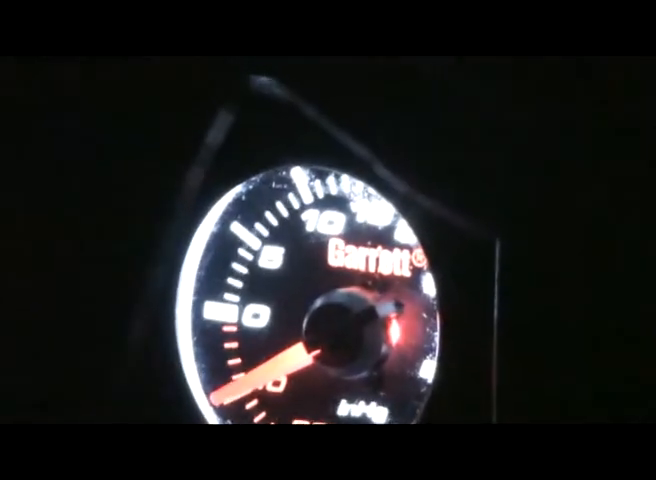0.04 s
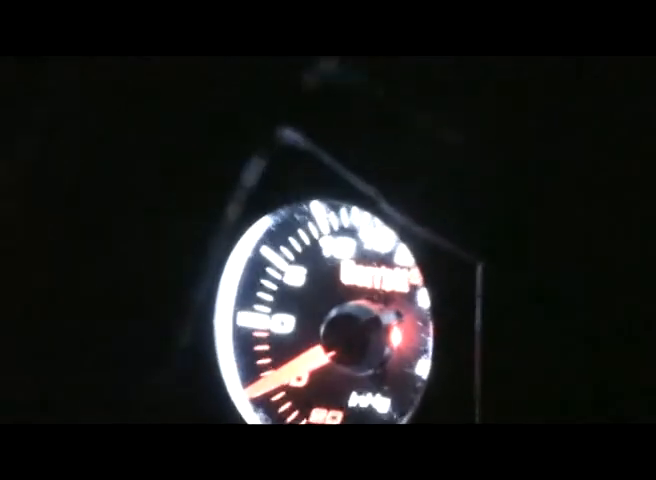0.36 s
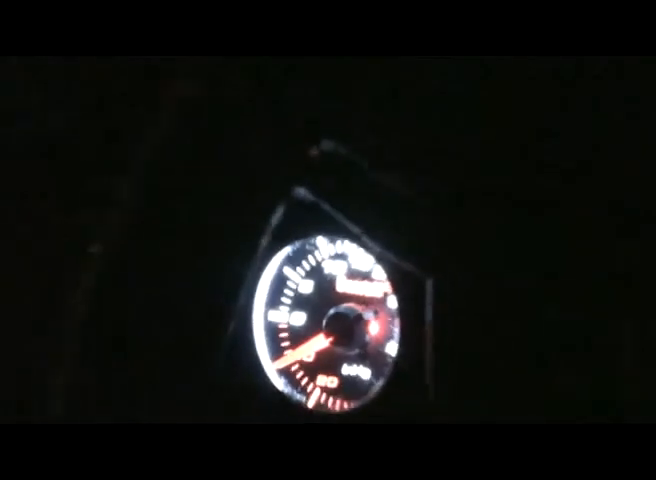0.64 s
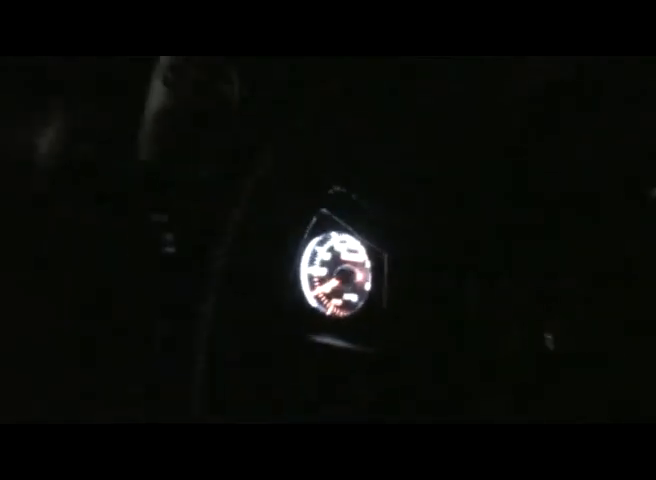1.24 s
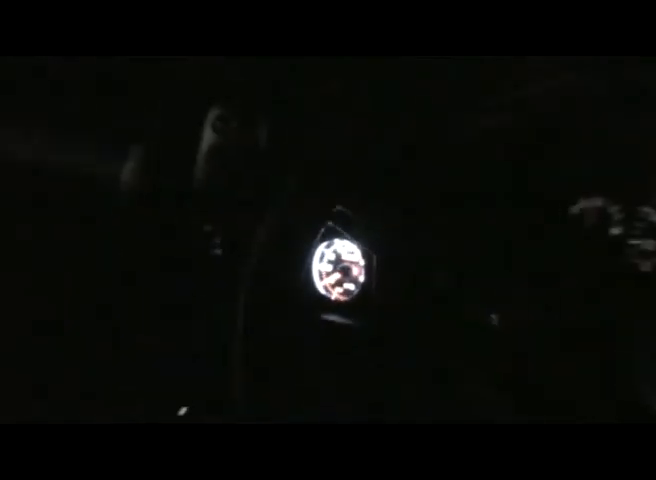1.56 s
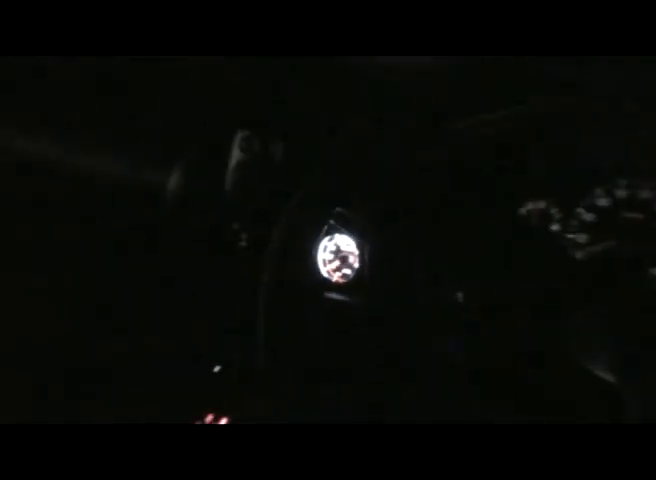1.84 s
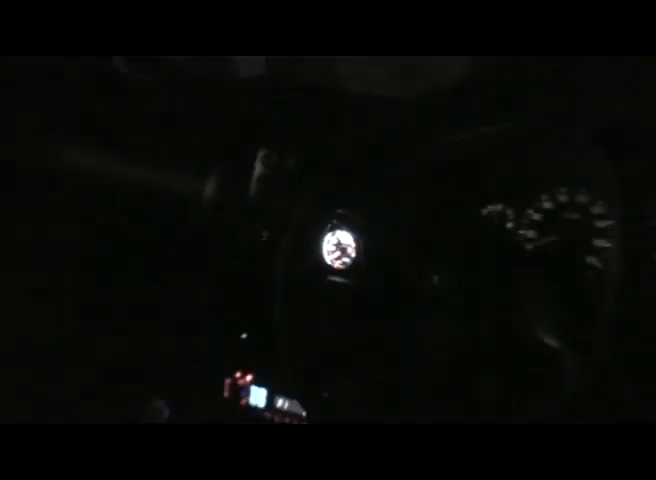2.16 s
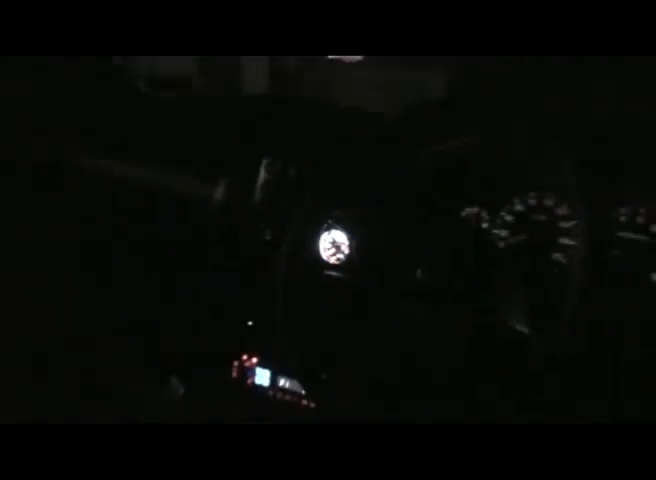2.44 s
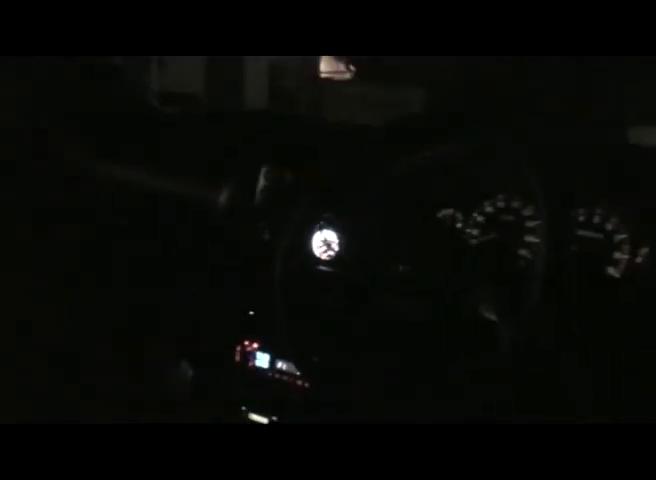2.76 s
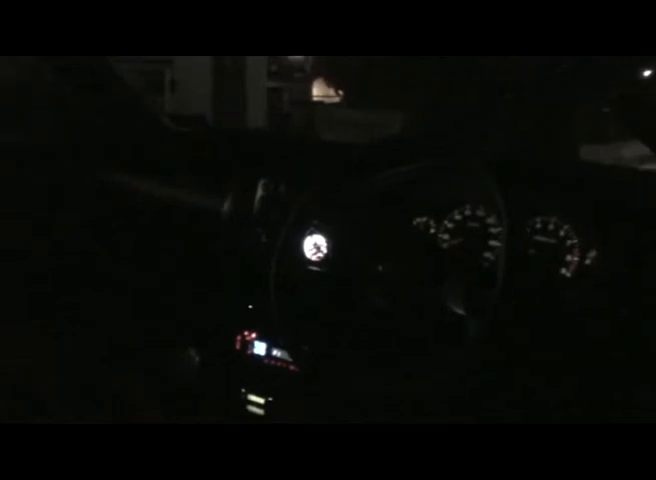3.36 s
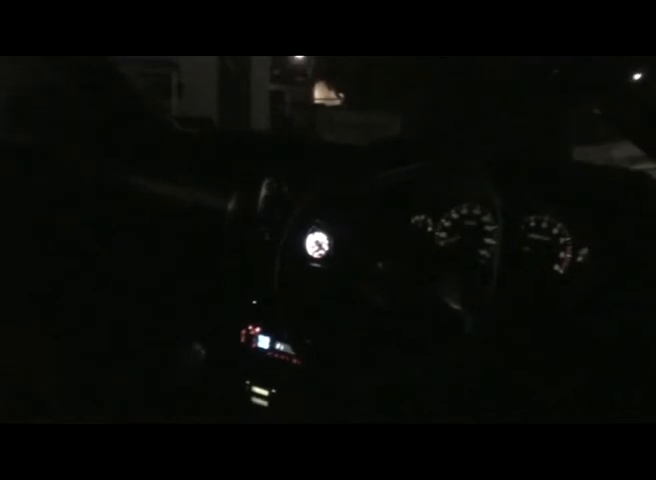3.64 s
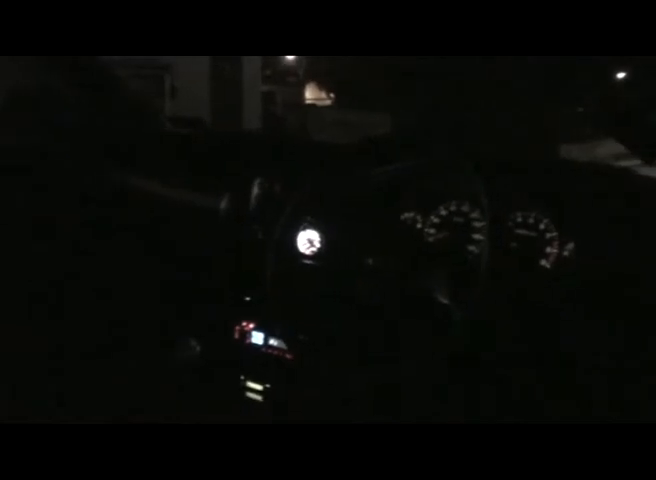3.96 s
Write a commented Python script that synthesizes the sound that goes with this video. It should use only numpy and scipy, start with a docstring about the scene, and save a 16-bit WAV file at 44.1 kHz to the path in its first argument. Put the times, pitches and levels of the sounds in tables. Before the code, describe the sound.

Four-cylinder engine idling steadily inside a parked car, with a deep throb and faint ticking.

```python
"""A four-cylinder engine idles at about 1030 rpm, heard from the driver's seat of a closed, parked car.
From the start, each firing pushes a pressure wave through the cabin and rings the exhaust; the cylinders
differ, so the beat is uneven. Valves clatter, hiss and ring through the engine wall, over a steady rush of
fan and belts. The first half second is a little brighter. Then small knocks come now and then, joined from
about 1 s by ticks of the tappets (the parts that push the valves). Near 3 s the middle tones swell briefly."""
import sys
import numpy as np
from scipy import signal
from scipy.fft import rfft, irfft
from scipy.io import wavfile
from scipy.ndimage import uniform_filter1d

SR = 44100
rng = np.random.default_rng(int(sys.argv[2]) if len(sys.argv) > 2 else 0)


def dump_mix(stems):
    """Bounce the given channels to the path in sys.argv[1] as a 16-bit WAV at rate SR."""
    frames = np.atleast_2d(stems).T  # one column per channel
    limited = np.clip(frames, -1, 1)  # hard clip at full scale
    pcm = np.round(limited * 32767).astype(np.int16)
    wavfile.write(sys.argv[1], SR, pcm)


N = 176400  # 4 seconds

# Engine speed. Each row: time in seconds, firings per second.
FIRING_RATE = [(0.0, 34.21), (0.25, 33.77), (0.45, 34.24), (0.65, 34.54), (0.88, 34.48), (1.2, 34.23),
               (1.38, 34.54), (1.65, 34.32), (1.95, 34.38), (2.2, 34.34), (2.6, 34.35), (2.95, 34.63),
               (3.28, 34.42), (3.5, 33.92), (3.68, 34.42), (3.85, 34.7), (4.0, 33.32)]
# The cylinders in firing order. Each row: boom in dB, exhaust pitch in Hz, exhaust level in dB,
# exhaust delay in seconds, then clatter, hiss, muffler thud and valve ring, each in dB.
CYLINDER_VOICES = [(0.62, 280.7, -21, .0005, -3, 5, -26, 1), (-1, 324, -30, -0.0062, -1.5, -43, -30, -27),
                   (-0.8, 311, -19, .0012, -9, 11.5, -27, 10), (-0.05, 248, -28, -.004, 1.5, 7, -45, 4)]
# The tones of the cabin boom. Each row: multiple of the firing rate, level in dB.
BOOM_TONES = [(1, -21), (2, -9), (3, -12), (4, -19.5), (5, -20), (6, -30.5), (7, -38), (8, -34.5)]
# How the engine block rings. Each row: frequency in Hz, relative level in dB.
BLOCK_CURVE = [(150, 2), (350, 1), (470, -1.5), (620, 5), (780, -8.5), (900, -9.5), (1200, -11),
               (1600, -10), (2300, -15), (2800, -15), (3300, -14.5), (4200, -22.5), (8000, -36),
               (14000, -57)]
# Narrow peaks and dips of the block and engine wall. Each row: frequency in Hz, width in Hz, lift in dB.
BLOCK_RESONANCES = [(376, 31, 7.5), (620, 22, -2.5), (774.5, 14.5, 6.5), (857, 72, -3.5), (1175, 20, 7),
                    (1323, 32, 9.5), (1590, 44, 3.5), (2108, 17, 7.5), (3510, 74, -5.5), (3750, 150, -1),
                    (4670, 240, -2.5), (8380, 250, 0.5), (9450, 200, 1.5), (10600, 600, 2)]
# The hiss of valves and fuel injectors. Each row: frequency in Hz, relative level in dB.
HISS_CURVE = [(1000, 0), (2200, 4.5), (3300, 2.5), (4800, -6.5), (5600, 3.5), (7500, 6.5), (8300, -4),
              (9500, 2), (11000, -4.5), (13700, -3.5)]
# The ringing tones of the valve metal. Each row: pitch in Hz, relative level in dB.
VALVE_TONES = [(3270, -4), (3620, -2.5), (4050, -5), (5520, 0.5), (5880, -1.5), (6480, -10), (7800, -6.5),
               (8160, -2.5), (8820, -2), (9020, -10), (9850, -8.5), (11550, -8), (12200, -12)]
# The rush of fan and belts. Each row: frequency in Hz, relative level in dB.
FAN_CURVE = [(80, 0.5), (160, 5.5), (300, 1), (420, -7), (650, -0.5), (950, -7), (1350, -13.5), (2200, -12),
             (3000, -21.5), (4500, -22.5), (7000, -29), (10000, -34), (13700, -40)]
# The faint rumble of the car body. Each row: frequency in Hz, relative level in dB.
RUMBLE_CURVE = [(15, -6), (30, 0), (60, 0), (120, -20), (400, -60)]
# Brief swells of engine noise. Each row: peak time in seconds, half length in seconds,
# frequency in Hz, width in Hz, level in dB.
NOISE_SWELLS = [(0.25, 0.28, 5500, 4600, -54), (0.18, 0.22, 1500, 700, -47), (2.99, 0.05, 710, 220, -37.5)]
# Small knocks from the engine bay. Each row: start in seconds, relative level in dB, pitch in Hz.
BAY_KNOCKS = [(0.4379, -43, 1350), (0.729, -38, 1315), (1.1448, -38, 1600), (1.3543, -36, 1310),
              (1.477, -37, 1330), (2.017, -40, 1640), (2.406, -36, 1320), (2.7107, -37, 1320),
              (3.056, -39, 1580), (3.2281, -40, 1370), (3.7525, -40, 1590), (3.935, -40, 1460)]
# Tappet ticks, higher and more blurred than the knocks. Each row: start in seconds, relative level in dB, pitch
# in Hz.
TAPPET_TICKS = [(0.9732, -46, 3100), (1.2007, -47, 3160), (1.2653, -46, 3110), (1.4344, -47, 3180),
                (2.9457, -44, 3170), (3.061, -44.5, 3230), (3.3525, -46, 3180), (3.5938, -62, 3280)]
# Engine-bay noise on the left compared with the right. Each row: frequency in Hz, gain in dB.
LEFT_CURVE = [(30, 20), (300, -7.5), (750, -6), (1300, -6), (1700, -11), (2200, -8.5), (5500, -10.5),
              (8000, -8.5), (10500, -2), (11300, -2.5), (12000, -25)]

AGE = np.arange(SR // 10) / SR  # seconds since the start of one short sound


def undb(db):
    """Turn decibels into a number to multiply by."""
    return 10 ** (np.asarray(db) / 20)


def level(x, db):
    """Scale a sound to an average (rms) level."""
    return x * undb(db) / np.sqrt(np.mean(x ** 2))


def colour(x, points, peaks=()):
    """Shape the tone with a smooth curve, plus any narrow peaks and dips."""
    f = np.maximum(np.arange(N // 2 + 1) * SR / N, 1)
    hz, db = np.array(points, float).T
    curve = np.interp(np.log(f), np.log(hz), db)
    for centre, width, lift in peaks:
        curve += lift / (1 + (2 * (f - centre) / width) ** 2)
    return irfft(rfft(x) * undb(curve), N)


def low_cut(x, cut_hz=85):
    """Remove the deep bass, which small parts cannot give off."""
    return signal.sosfilt(signal.butter(4, cut_hz, "high", fs=SR, output="sos"), x)


def wander(per_second):
    """A smooth random drift, typically about 1 either way."""
    size = int(SR / per_second)
    steps = np.repeat(rng.standard_normal(N // size + 1), size)
    drift = uniform_filter1d(steps, size)[:N]
    return drift / drift.std()


def noise_pair(size, likeness=0.38):
    """Partly alike noise for left and right."""
    right, other = rng.standard_normal((2, size))
    return np.array([likeness * right + np.sqrt(1 - likeness ** 2) * other, right])


def noise_band(hz, width_hz, size=N):
    """Noise gathered around one pitch, at an average level of 1."""
    f = np.arange(size // 2 + 1) * SR / size
    bell = np.exp(-2 * ((f - hz) / width_hz) ** 2)
    return level(irfft(rfft(rng.standard_normal(size)) * bell, size), 0)


def add(out, start_s, sound):
    """Mix a sound in at a time, dropping what falls outside the scene."""
    i = int(start_s * SR)
    lo, hi = max(i, 0), min(i + sound.shape[-1], N)
    if hi > lo:
        out[..., lo:hi] += sound[..., lo - i:hi - i]


def firings(t, first_s=0.0079, jitter_s=0.0001):
    """Count and time the firings, with a few extra before the start and after the end."""
    count = np.cumsum(np.interp(t, *np.array(FIRING_RATE).T)) / SR
    count -= np.interp(first_s, t, count)
    numbers = np.arange(-4, int(count[-1]) + 4)
    inside = np.clip(numbers, count[0], count[-1])
    times = np.interp(inside, count, t) + (numbers - inside) / FIRING_RATE[0][1]
    return numbers, times + rng.normal(0, jitter_s, len(times))


def cabin_boom(t, numbers, times, boom_db, scatter_db=0.2):
    """Each firing swings the air pressure in the cabin down, then sharply up."""
    cycles = np.interp(t, times, numbers)
    strength = np.interp(t, times, undb(rng.normal(boom_db, scatter_db)))
    return strength * sum(undb(db) * np.sin(2 * np.pi * multiple * cycles) for multiple, db in BOOM_TONES)


def exhaust(times, pitches_hz, levels_db, rise_s, scatter_db=0.5, detune=0.003):
    """Each puff of gas rings the exhaust with a tone that swells and dies."""
    out = np.zeros(N)
    swell = (AGE / rise_s * np.exp(1 - AGE / rise_s)) ** 2
    for at, hz, db in zip(times, pitches_hz, levels_db):
        tone = np.sin(2 * np.pi * hz * rng.normal(1, detune) * AGE)
        add(out, at, undb(rng.normal(db, scatter_db)) * swell * tone)
    return out


def across_cabin(t, wave, left_db, lag_s=0.00049):
    """A low pressure wave reaches the left microphone upside down, weaker and slightly late."""
    return np.array([-undb(left_db) * np.interp(t - lag_s, t, wave), wave])


def valve_clatter(numbers, times, clatter_db, decay_s=0.028, scatter_db=1.5, jitter_s=0.0004):
    """Valves knock the engine block, which answers with a noisy ring of its own for each cylinder."""
    out = np.zeros((2, N))
    rings = [noise_pair(len(AGE)) * np.exp(-AGE / decay_s) for _ in CYLINDER_VOICES]
    for number, at, db in zip(numbers, times, clatter_db):
        strength = undb(rng.normal(db, scatter_db))
        add(out, rng.normal(at, jitter_s), strength * rings[number % len(rings)])
    return level(low_cut(colour(out, BLOCK_CURVE, BLOCK_RESONANCES)), db=-37.5)


def valve_hiss(times, hiss_db, rise_s=0.0025, decay_s=0.042, scatter_db=0.3, grain_db=1.5):
    """Valves and injectors spit a grainy hiss that starts with each firing and fades."""
    loudness = np.zeros(N)
    spit = (1 - np.exp(-AGE / rise_s)) * np.exp(-AGE / decay_s)
    for at, db in zip(times, hiss_db):
        add(loudness, at, undb(rng.normal(db, scatter_db)) * spit)
    hiss = noise_pair(N) * loudness * undb(grain_db * wander(per_second=900))
    return level(colour(hiss, HISS_CURVE, BLOCK_RESONANCES), db=-53)


def valve_ring(times, valve_db, decay_s=0.036, blur_hz=110):
    """Closing valves ring the metal, whose blurred tones blend differently every time."""
    loudness = np.zeros(N)
    for at, db in zip(times, valve_db):
        add(loudness, at, undb(db) * np.exp(-AGE / decay_s))
    metal = [sum(undb(db) * noise_band(hz, blur_hz) for hz, db in VALVE_TONES) for _ in range(2)]
    return level(loudness * np.array(metal), db=-55.5)


def fan_and_belts(flutter_db=1):
    """The fan and belts make a steady, lightly fluttering rush."""
    air = noise_pair(N) * undb(flutter_db * wander(per_second=20))
    return level(low_cut(colour(air, FAN_CURVE, BLOCK_RESONANCES)), db=-34)


def body_rumble():
    """The car body rumbles, deep and faint."""
    return level(colour(noise_pair(N), RUMBLE_CURVE), db=-58)


def swells(t):
    """Bands of noise rise and fall: bright ones at the start, a lower one near 3 s."""
    out = np.zeros((2, N))
    for at, half_s, hz, width_hz, db in NOISE_SWELLS:
        loudness = undb(db) * np.exp(-((t - at) / half_s) ** 2)
        out += loudness * np.array([noise_band(hz, width_hz) for _ in range(2)])
    return out


def blows(events, gain_db, decay_s, width_hz, rise_s=0.003, left_db=1):
    """A knock or tick rings a cluster of close tones, softened by the engine wall."""
    out = np.zeros(N)
    shape = (1 - np.exp(-AGE / rise_s)) * np.exp(-AGE / decay_s)
    shape /= shape.max()
    tone_rms = np.sqrt(np.mean(shape ** 2) / 2)  # average level of a pure tone with this shape
    for at, db, hz in events:
        ring = shape * noise_band(hz, width_hz, len(AGE))
        add(out, at, level(ring, db + gain_db) * tone_rms)
    return np.array([undb(left_db) * out, out])


def scene():
    """Boom and exhaust fill the cabin; the engine-bay noise leans to the right."""
    t = np.arange(N) / SR
    numbers, times = firings(t)
    voices = np.array(CYLINDER_VOICES)[numbers % len(CYLINDER_VOICES)]
    boom_db, pipe_hz, pipe_db, delay_s, clatter_db, hiss_db, thud_db, valve_db = voices.T
    boom = cabin_boom(t, numbers, times, boom_db)
    thud_hz, thud_lead_s = np.full(len(times), 165), 0.006  # the muffler thuds just ahead of the boom
    thud = exhaust(times - thud_lead_s, thud_hz, thud_db, rise_s=0.007)
    pipe = exhaust(times + delay_s, pipe_hz, pipe_db, rise_s=0.0094)
    lows = across_cabin(t, boom + thud, left_db=-7.5) + across_cabin(t, pipe, left_db=-9.5)
    valves = valve_clatter(numbers, times, clatter_db)
    valves += valve_hiss(times, hiss_db) + valve_ring(times, valve_db)
    rush = fan_and_belts() + body_rumble() + swells(t)
    knocks = blows(BAY_KNOCKS, gain_db=-1, decay_s=0.0073, width_hz=76)
    ticks = blows(TAPPET_TICKS, gain_db=2, decay_s=0.009, width_hz=380)
    left, right = valves + rush + knocks + ticks
    return lows + np.array([colour(left, LEFT_CURVE), right])


def record(dry):
    """Cut away the very highest treble."""
    top_hz = 13750
    return signal.sosfilt(signal.ellip(10, .2, 80, top_hz, fs=SR, output="sos"), dry)


dry = scene()
out = record(dry)
dump_mix(out)
```